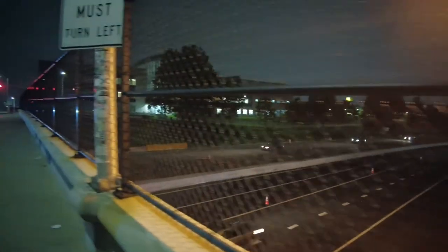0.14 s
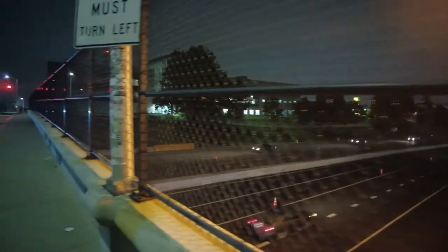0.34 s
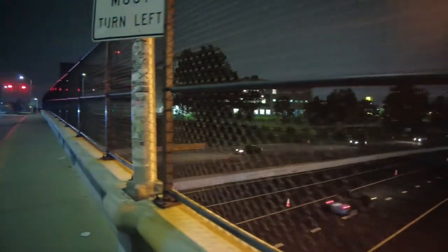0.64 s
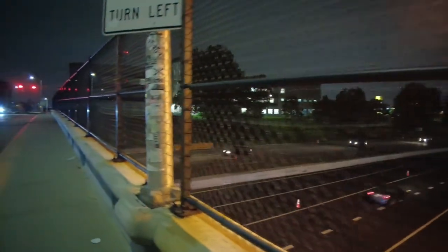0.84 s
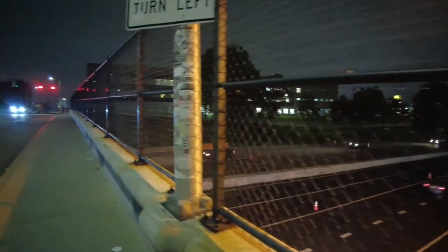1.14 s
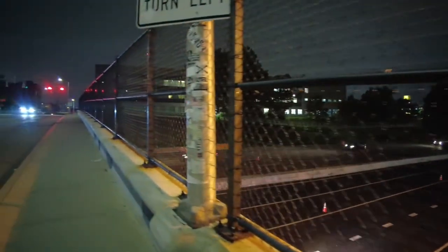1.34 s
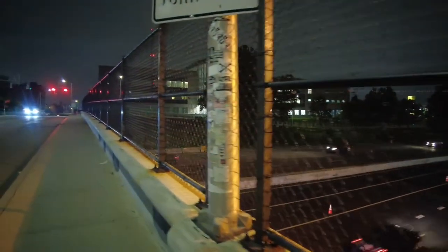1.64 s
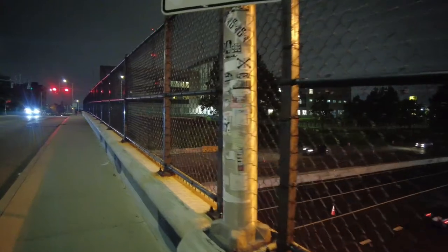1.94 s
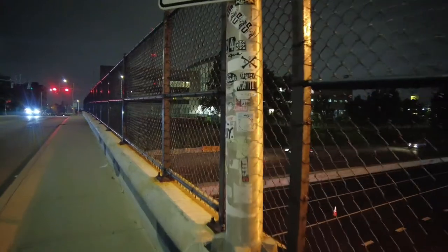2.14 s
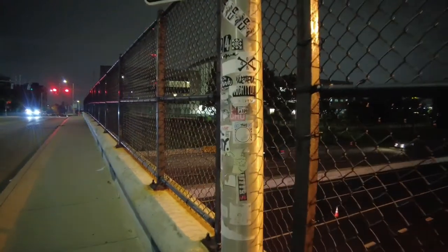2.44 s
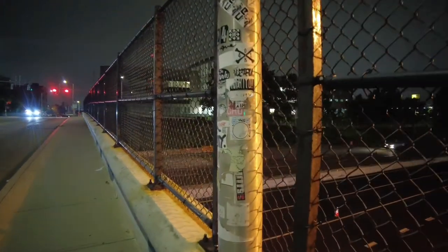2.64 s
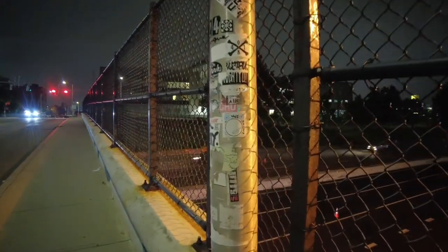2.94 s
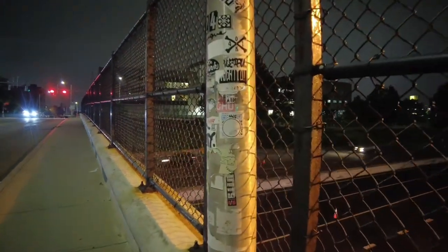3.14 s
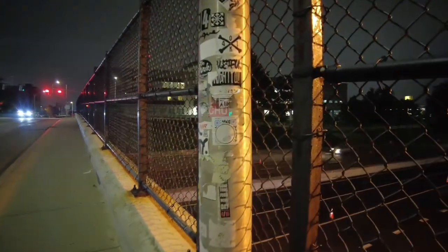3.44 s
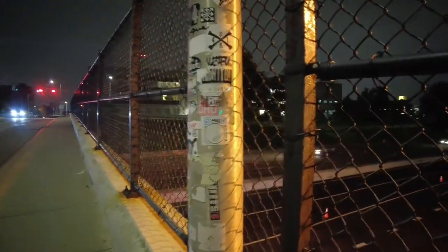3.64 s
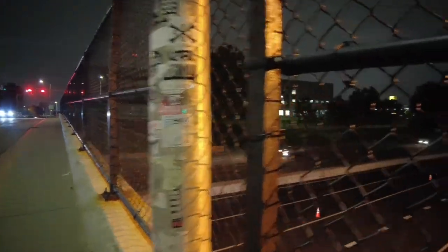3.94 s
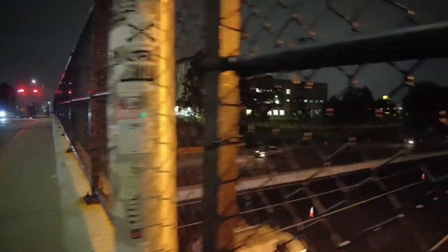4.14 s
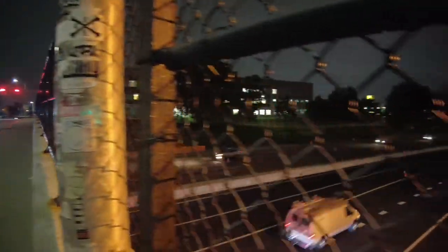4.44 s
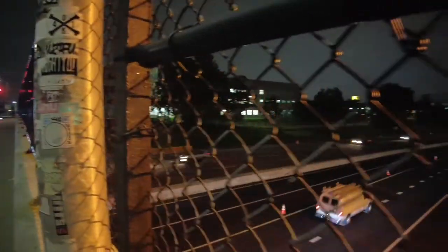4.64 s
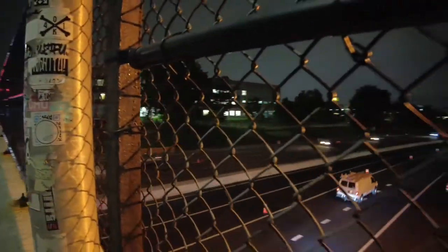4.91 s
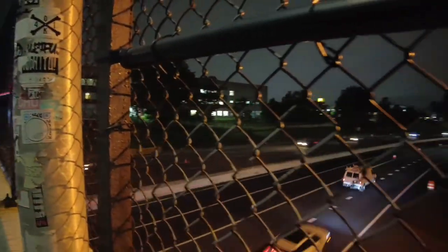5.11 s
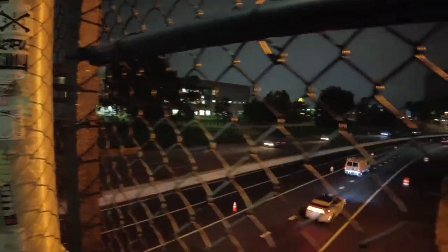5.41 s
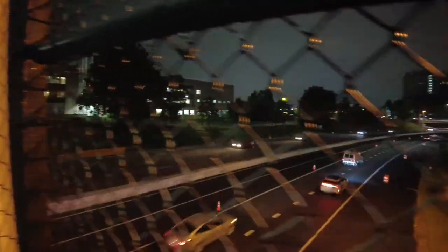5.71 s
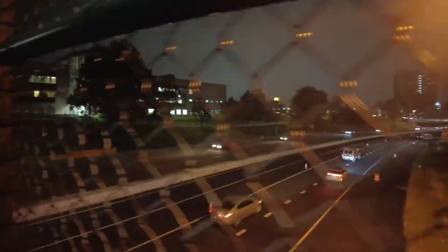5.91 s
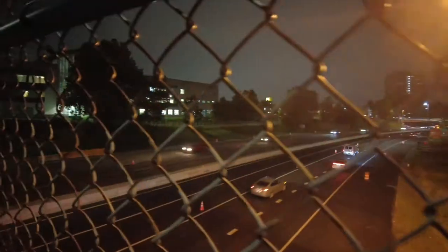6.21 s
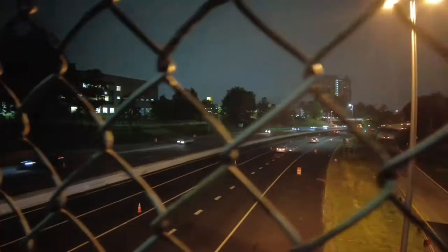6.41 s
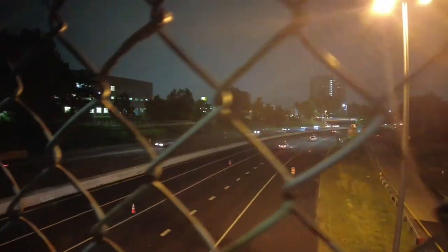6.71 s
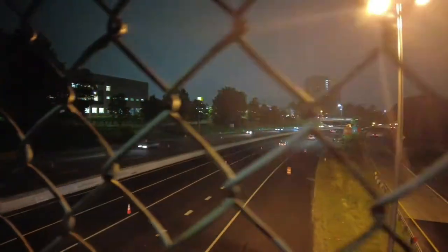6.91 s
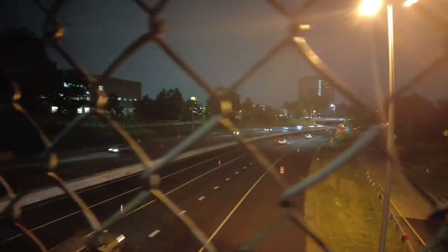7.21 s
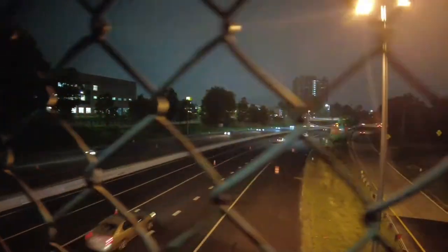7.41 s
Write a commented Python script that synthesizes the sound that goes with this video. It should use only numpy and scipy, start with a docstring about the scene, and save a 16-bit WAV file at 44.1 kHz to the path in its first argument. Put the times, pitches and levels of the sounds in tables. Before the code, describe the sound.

Heard in stereo from a bridge above a highway at night, traffic rushes without letup, first on the right, then centred, finally a little left. Overlapping cars rise and recede with roaring, hissing tyres and throbbing low engines, among them a droning van. A tiny high ping comes midway. Late on, the sound drops out briefly, then returns with another faint ping and more passing cars.

```python
"""Cars rush along a night highway, heard from an overpass by someone who turns to face the road.
Each car comes out from under the bridge, swells and fades: tyres roar and hiss, exhausts rumble,
a van drones away. Two faint pings ring close by. Two close microphones give the direction.
Near the end the sound drops out for a fifth of a second and the traffic jumps ahead."""
import sys
import numpy as np
from scipy import signal
from scipy.fft import rfft, irfft, next_fast_len
from scipy.io import wavfile
from scipy.ndimage import uniform_filter1d, map_coordinates

SR = 44100
rng = np.random.default_rng(int(sys.argv[2]) if len(sys.argv) > 2 else 0)


def store_pcm(level_fs):
    """Save levels as 16-bit WAV."""
    pcm = np.round(np.clip(level_fs, -1, 1) * 32767).astype(np.int16)
    wavfile.write(sys.argv[1], SR, np.atleast_2d(pcm).T)


N = 333396
T = np.arange(N) / SR
GAP_START_S, GAP_END_S = 6.167, 6.371  # the sound drops out between these times

# One row per passing car, with its level in each layer: nearest_s, boom_db, rumble_db, road_db,
# tread_db, groove_db, hiss_db, spray_db, air_db, tread_pitch_factor, tread_width_factor
CARS = [(.72, -35.5, -42.5, -35.5, -41, -43, -51.5, -66, -69, 0.75, 1.8),
        (.98, -42, -35.5, -37.5, -35, -38.5, -45, -59, -75, 0.95, 1.26),
        (1.97, -35, -36.5, -35.5, -37.5, -37.5, -46.5, -59.5, -72, 1.02, .7),
        (2.58, -30, -30, -34, -36.5, -42, -50.5, -64, -84, 0.92, 0.94),
        (3.3, -36, -33.5, -39, -39.5, -43, -51.5, -64.5, -89, 0.98, 1.07),
        (4.53, -43, -35.5, -36.5, -38.5, -42, -45, -60, -63, 0.93, 0.95),
        (4.88, -35, -45, -48, -34, -37, -47, -59.5, -63, 0.94, 0.93),
        (5.37, -39.5, -40, -44, -37.5, -38, -44.5, -56.5, -64.5, .98, 1.06),
        (6.03, -42, -36, -41.5, -35.5, -36.5, -42, -56, -67, 0.94, 1.2),
        (6.6, -39, -46, -41, -35.5, -44.5, -53.5, -78.5, -90, 0.96, 0.98),
        (7.4, -46, -50, -40, -39.5, -39, -45.5, -54.5, -63, 1.01, 1.2)]


def amp(db):
    """Turn decibels into a gain."""
    return 10 ** (np.asarray(db) / 20)


def unit(x):
    """Scale a signal to an average power of 1."""
    return x / np.sqrt(np.mean(x ** 2) + 1e-20)


def along(points, hz):
    """Read a table of (pitch_hz, value) rows on a log pitch scale."""
    pitches, values = np.transpose(points)
    return np.interp(np.log(hz + 1), np.log(pitches + 1), values)


def wobble(rate):
    """A smooth random curve through `rate` points a second."""
    return map_coordinates(rng.standard_normal(int(N * rate / SR) + 4), [T * rate])


def ages(skip_s=.31):
    """Seconds since each car was nearest, one row per car; time skips ahead at the dropout."""
    now = T + skip_s * (T > GAP_END_S)
    nearest = np.transpose(CARS)[0]
    nearest = nearest + skip_s * (nearest > GAP_END_S)
    return now - nearest[:, None]


def swell(age, approach_s, departure_s):
    """A gain that rises and falls: 1 at age 0, half at approach_s before and departure_s after."""
    steepness = 3.4  # the bridge hides a car until it is close (2 in the open)
    return 1 / (1 + np.where(age < 0, np.abs(age / approach_s) ** steepness, (age / departure_s) ** 2))


def traffic(peaks_db, far_db, approach_s, departure_s):
    """Gain of one layer: the power of every passing car adds to a steady wash of far traffic."""
    each_car = amp(peaks_db)[:, None] * swell(ages(), approach_s, departure_s)
    return np.sqrt(amp(far_db) ** 2 + np.sum(each_car ** 2, axis=0))


def microphones(direct, scattered, hz, times):
    """Sound reaches one microphone first, which gives its direction; scattered sound blurs that."""
    # Where the traffic lies as the listener turns; a lead is how early the left side is, before widening:
    # time_s, hiss_lead_ms, roar_lead_ms, roar_scatter_db, treble_scatter_db
    bearing = [(0, -.09, -.09, 0, 1.5), (1.1, -.115, -.105, -.7, 1.7), (2.4, -.11, -.128, -2, 1.7),
               (4.1, -.075, -.11, 1, 2), (4.38, -.012, -.085, -.5, -2.5), (5.3, 0, -.06, 0, -2.8),
               (5.8, .02, -.012, -.5, -2.5), (6.15, .02, 0, -1, -2), (6.4, .03, .072, 1, 2),
               (7.15, .085, .095, .3, 2)]
    # The recorder widens the stereo below 1.2 kHz. Apart from that, the very top sits in the centre: pitch_hz,
    # lead_factor
    widening = [(100, 2.5), (400, 3.1), (800, 2.9), (950, 3.6), (1170, 3.7), (1260, .95), (3000, .95),
                (3700, .55), (4400, 1), (5800, .8), (7200, 0)]
    # The two microphones differ slightly in tone: pitch_hz, left_minus_right_db
    mismatch = [(200, 0), (600, .8), (1150, 1.1), (1400, -.2), (2500, -1), (10000, -.8)]
    # Scattered sound compared with direct sound: pitch_hz, level_db
    scatter = [(25, -16), (60, -22.5), (150, -18), (300, -14.5), (500, -10), (800, -6.5), (1170, -5),
               (1270, -11), (2500, -6.8), (4000, -4.6), (6000, -4.2), (8000, -4.8), (14000, -5)]
    # How much the scattering follows treble_scatter_db: pitch_hz, share
    treble_share = [(2500, 0), (4000, 1)]
    turn_s, *columns = np.transpose(bearing)
    hiss_ms, roar_ms, roar_db, treble_db = (np.interp(times, turn_s, column) for column in columns)
    lead_ms = np.where(hz < 1220, roar_ms, hiss_ms) * along(widening, hz)
    to_left = amp(along(mismatch, hz) / 2) * np.exp(1j * np.pi * hz * lead_ms / 1000)
    share = amp(along(scatter, hz) + roar_db + along(treble_share, hz) * (treble_db - roar_db))
    left = (direct + share * scattered) * to_left
    right = (direct - share * scattered) / to_left
    return np.array([left, right]) / np.hypot(1, share)


def rush(spectrum, patchy_db=1.6, pitch=1, width=1):
    """Stereo noise of power 1; pitch shifts its spectrum and width stretches it around 900 Hz."""
    hz, times, noise = signal.stft(rng.standard_normal((2, N)), SR, nperseg=2048)
    hz = hz[:, None]
    # The noise is slightly uneven, in random patches of pitch and time.
    patches = uniform_filter1d(rng.standard_normal(noise.shape[1:]), size=4, axis=0)
    patches = uniform_filter1d(patches, size=6, axis=1)
    pitch, width = (np.interp(times, T, factor * np.ones(N)) for factor in (pitch, width))
    colour_db = along(spectrum, 900 * (hz / pitch / 900) ** (1 / width))
    direct, scattered = noise * amp(colour_db + patchy_db * unit(patches)) / np.sqrt(width)
    stereo = microphones(direct, scattered, hz, times)
    return unit(signal.istft(stereo, SR, nperseg=2048)[1][:, :N])


def pings():
    """Thin, high rings die away close by, perhaps from the wire fence."""
    # One row per ping: start_s, pitch_hz, level_db, fade_s (time to fall by 60 dB)
    rings = [(3.009, 13800, -53, .03), (6.379, 4500, -52, 0.32)]
    sound = np.zeros(N)
    for start_s, hz, db, fade_s in rings:
        age = np.maximum(T - start_s, 0)
        sound += amp(db - 60 * age / fade_s) * np.sin(2 * np.pi * hz * age)
    return sound


def low_note(loudest_s, pitch_hz, level_db, half_s):
    """A low note swells, wavers and sinks slightly in pitch; a long one is an engine's drone."""
    age = T - loudest_s
    hz = pitch_hz * (1 - .015 * age + .018 * wobble(13))
    phase = 2 * np.pi * np.cumsum(hz) / SR
    note = np.zeros(N)
    for harmonic, db in ((1, 0), (2, -14)):
        gain = amp(db + 1.8 * wobble(6))  # each harmonic flutters on its own
        note += gain * np.sin(harmonic * phase + 2 * np.pi * rng.random())
    return amp(level_db) * swell(age, half_s, half_s) * unit(note)


def exhausts_and_road():
    """The space under the bridge booms, engines blur into a rumble and the road roars."""
    # The tone of each of these three noises: pitch_hz, relative_db
    boom_tone = [(8, -39), (20, -14.5), (30, 3.5), (45, 11.5), (66, 8.5), (80, 0), (110, -61)]
    rumble_tone = [(55, -40), (72, -9.5), (85, 1), (108, -2.5), (135, -11), (165, -15), (300, -94)]
    road_tone = [(100, -27), (150, -1.5), (190, 2.2), (260, -2.5), (320, -2.5), (420, -3.5), (510, -3.5),
                 (600, -6), (680, -8.5), (850, -34), (1500, -94)]
    # Brief low swells in the rumble; only the long ones are engine drones:
    # loudest_s, pitch_hz, level_db, half_s (time to half gain)
    low_swells = [(1.05, 68.5, -34.5, 0.061), (1.53, 60, -30.5, 0.14), (2.398, 85.2, -30, 0.076),
                  (2.65, 64, -26.5, .055), (2.82, 80.8, -29, 0.048), (2.55, 185, -34, 0.1),
                  (2.88, 182, -35.5, 0.077), (3.62, 59, -29, 0.048), (3.8, 181.4, -38, 0.2),
                  (4.25, 71, -33, 0.21), (4.25, 210.5, -40, 0.083), (4.531, 226, -39, 0.13),
                  (5.2, 44.05, -33.5, 0.14), (5.5, 52.1, -31, 0.063), (6.68, 50.25, -31, 0.077),
                  (4.751, 101.7, -34.5, 0.35), (5.86, 58, -28.5, .1), (6.549, 101, -38, 0.38),
                  (7.06, 46.3, -31.5, 0.053)]
    # Uneven throbs in the bass: time_s, rise_db
    throbs = [(.74, 3), (1.06, 5), (1.57, 2), (2.17, 5), (2.65, 3), (2.81, 5), (3.04, 0), (3.37, 1.5),
              (3.62, 4.5), (3.86, 4.5), (4.11, 4.5), (4.34, 4), (4.88, 5), (5.2, 1), (5.85, 0.5),
              (6.68, 4.5), (6.85, 0.5), (7.06, 1)]
    boom_db, rumble_db, road_db = np.transpose(CARS)[1:4]
    boom = traffic(boom_db, far_db=-33, approach_s=.22, departure_s=1)
    boom = boom * amp(.45 * wobble(7.9)) * rush(boom_tone, patchy_db=0)
    rumble = traffic(rumble_db, far_db=-36.5, approach_s=.44, departure_s=.64)
    rumble = rumble * amp(.37 * wobble(6.2)) * rush(rumble_tone, patchy_db=1.05)
    road = traffic(road_db, far_db=-38, approach_s=.49, departure_s=.57)
    road = road * amp(.42 * wobble(16)) * rush(road_tone, patchy_db=1)
    notes = sum(low_note(*row) for row in low_swells)
    throb_db = -1 + sum(rise_db * np.exp(-((T - time_s) / .034) ** 2) for time_s, rise_db in throbs)
    return amp(throb_db) * (boom + rumble) + road + notes


def tread_roar(approach_s=.63, departure_s=.55):
    """The tyres' tread blocks roar near 1 kHz; the loudest cars set the roar's pitch and width."""
    # The tone of the roar: pitch_hz, relative_db
    tread_tone = [(300, -79), (520, -36), (630, -8.5), (700, -2), (800, -1), (930, 1.5), (1050, 0.2),
                  (1170, -4), (1250, -10), (1400, -28), (2200, -100)]
    tread_db, pitches, widths = np.transpose(CARS)[[4, 9, 10]]
    age = ages()
    power = (amp(tread_db)[:, None] * swell(age, approach_s, departure_s)) ** 2
    doppler = 1 - .021 * np.tanh(age / .68)  # higher as a car comes, lower as it leaves
    pitch = np.average(pitches[:, None] * doppler, axis=0, weights=power)
    width = widths @ power / power.sum(axis=0)
    gain = traffic(tread_db, far_db=-37, approach_s=approach_s, departure_s=departure_s)
    return gain * amp(.38 * wobble(12)) * rush(tread_tone, pitch=pitch, width=width)


def tyres():
    """The tread roars, the grooves rush just above it, and air squeezed by the tyres hisses."""
    # The tone of the groove rush, hiss, finer spray of hiss and airy top: pitch_hz, relative_db
    groove_tone = [(700, -76), (1130, -29.5), (1200, 3), (1260, 0.5), (1400, -2), (1550, -2.5),
                   (1750, -4.5), (2000, -9), (2200, -22.5), (2600, -34), (4000, -100)]
    hiss_tone = [(1000, -55.5), (1750, -25.5), (2100, 2.5), (2330, -0.5), (2700, 0), (3150, -3), (3700, -7),
                 (4400, -8.5), (5100, -14.5), (6100, -19), (7000, -26), (9000, -45), (14000, -110)]
    spray_tone = [(3600, -28), (4800, 0), (5500, 1.2), (6300, 1), (7000, -1.5), (7800, -0.5), (9400, -2.6),
                  (10200, -5), (12500, -8.5), (15200, -16.5)]
    air_tone = [(7000, -38), (10000, -8), (12000, -2), (15200, -4.5)]
    groove_db, hiss_db, spray_db, air_db = np.transpose(CARS)[5:9]
    surface = amp(.35 * wobble(14))  # uneven pavement moves all the layers together
    tread = tread_roar()
    grooves = traffic(groove_db, far_db=-40.5, approach_s=.54, departure_s=.4) * rush(groove_tone)
    hiss = traffic(hiss_db, far_db=-49.5, approach_s=.37, departure_s=.53) * rush(hiss_tone)
    spray = traffic(spray_db, far_db=-65.5, approach_s=.36, departure_s=.47) * rush(spray_tone)
    air = traffic(air_db, far_db=-88, approach_s=.24, departure_s=.4) * rush(air_tone)
    flicker = amp(.66 * wobble(18))
    return surface * (tread + grooves + hiss + flicker * (spray + air))


def scene():
    """Two faint pings, and the engines and tyres of all lanes."""
    return pings() + exhausts_and_road() + tyres()


def record(dry):
    """The sound cuts out and fades quickly back in; the recorder colours it and cuts the very top."""
    # A narrow dip parts the tread roar from the groove rush: pitch_hz, gain_db
    colour = [(1000, 0), (1130, 1), (1190, -1), (1250, 0), (1380, 0.5), (1500, 0)]
    before_gap = np.clip((GAP_START_S - T) / .002, 0, 1)
    after_gap = np.clip((T - GAP_END_S) / .012, 0, 1)
    size = next_fast_len(N + SR // 2)
    hz = np.fft.rfftfreq(size, 1 / SR)
    spectrum = rfft(dry * (before_gap + after_gap), size)
    return irfft(spectrum * amp(along(colour, hz)) * (hz < 15400), size)[:, :N]


dry = scene()
out = record(dry)
store_pcm(out)
```